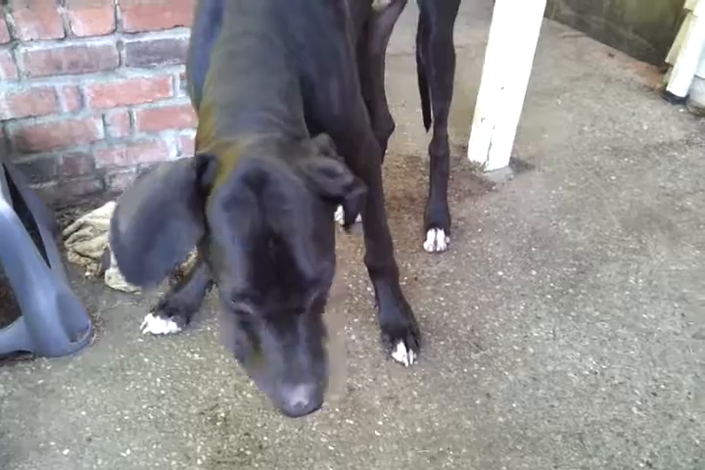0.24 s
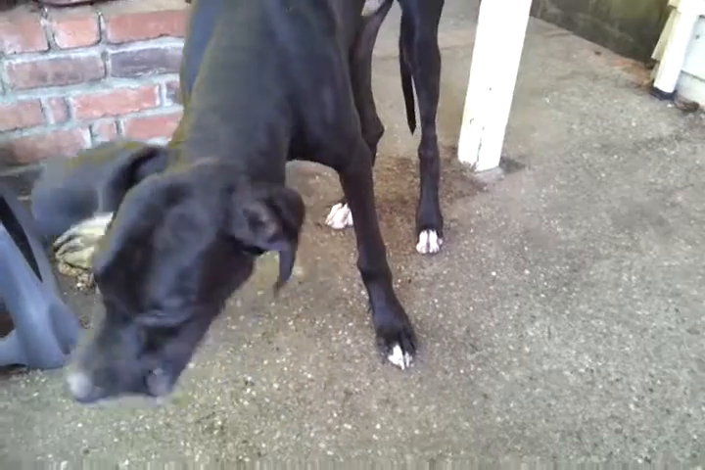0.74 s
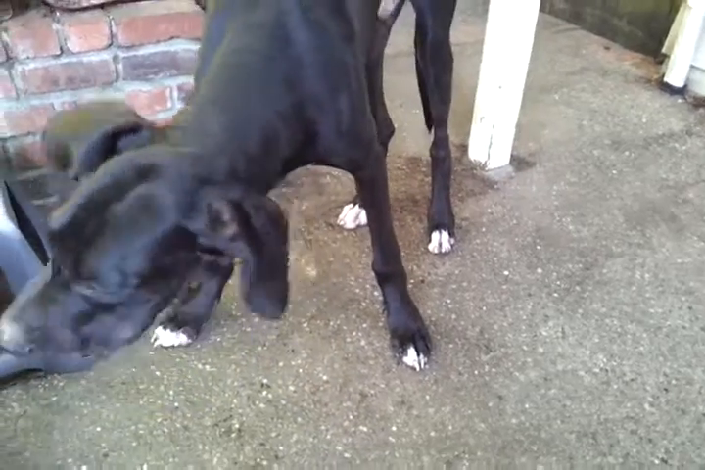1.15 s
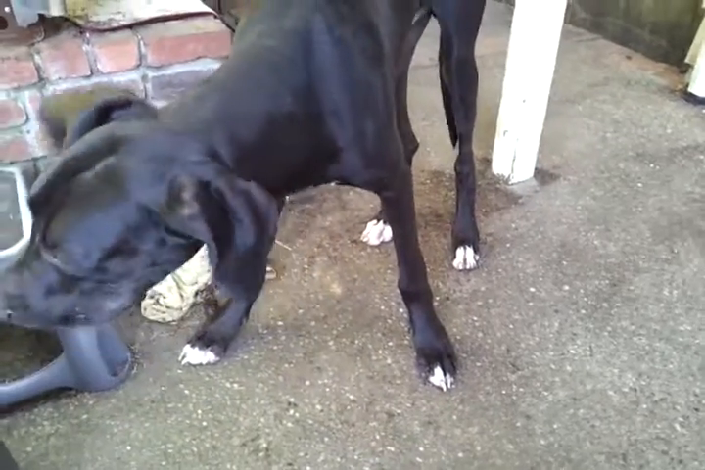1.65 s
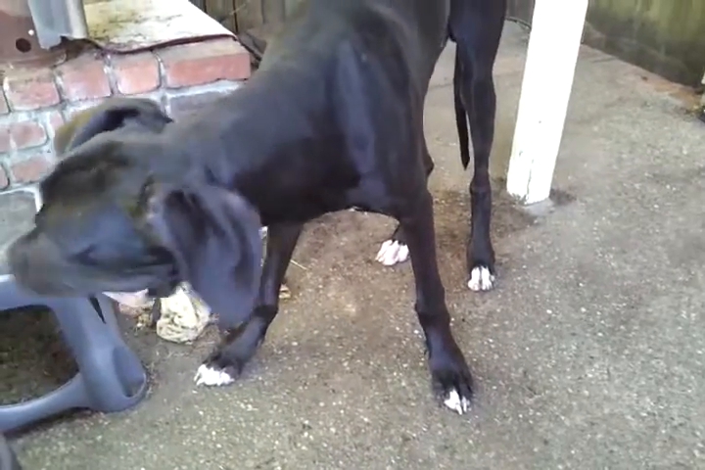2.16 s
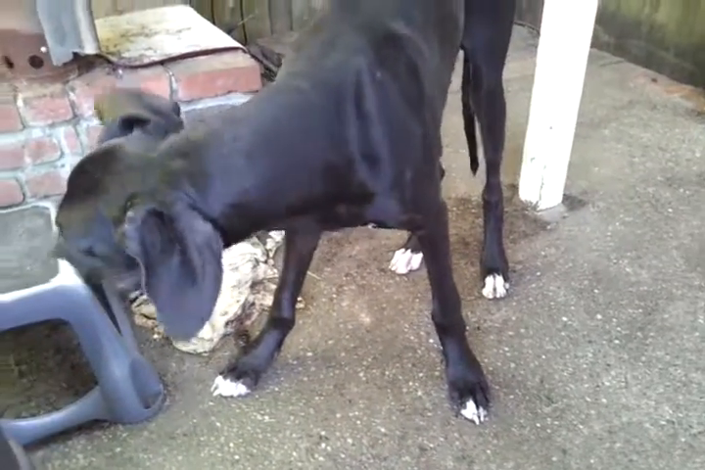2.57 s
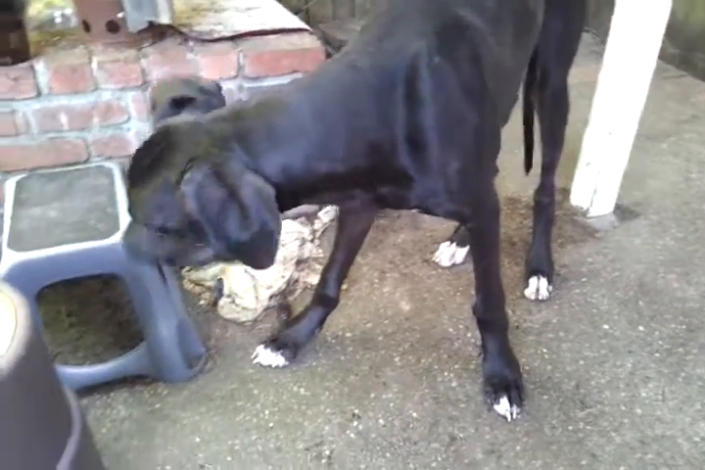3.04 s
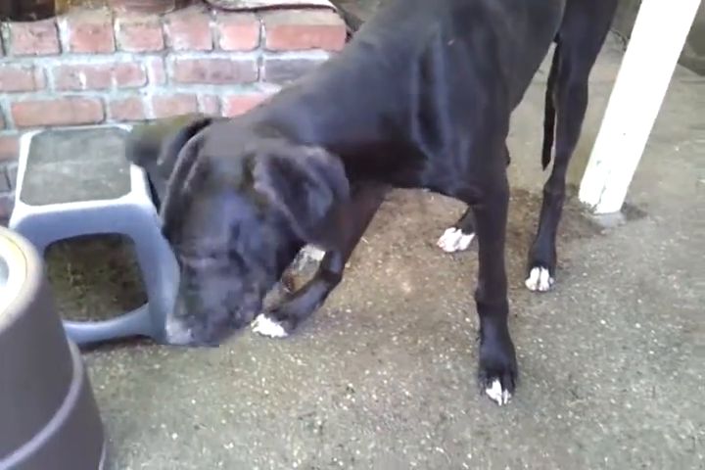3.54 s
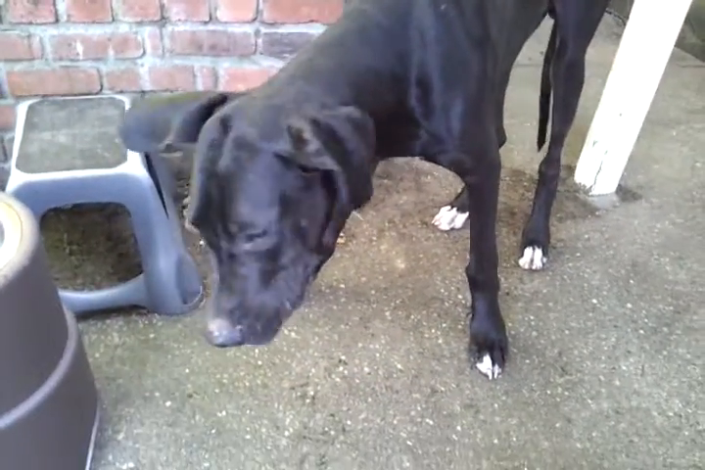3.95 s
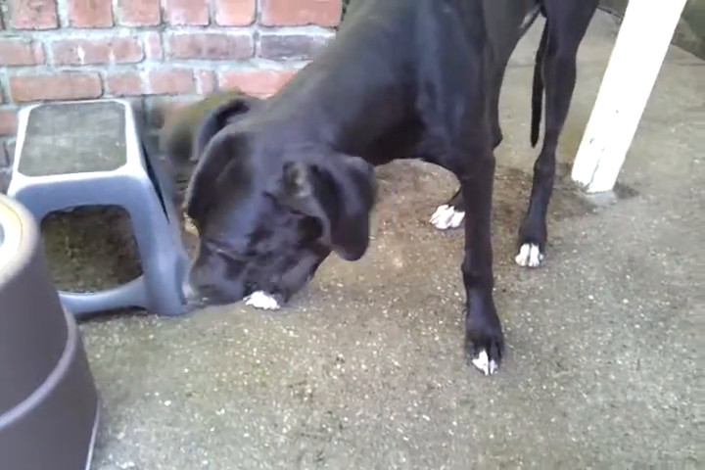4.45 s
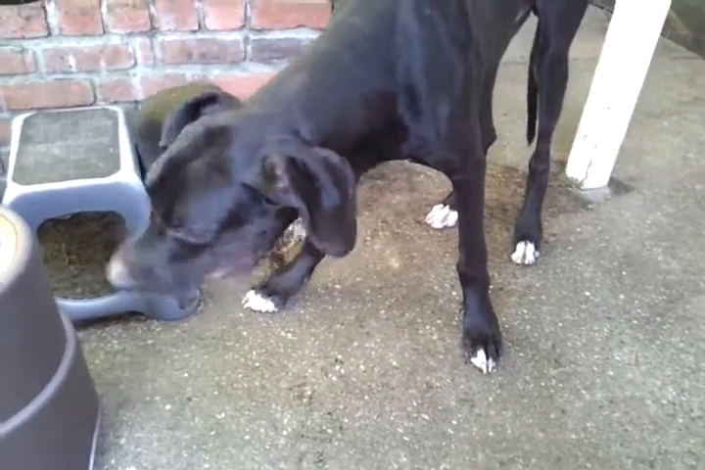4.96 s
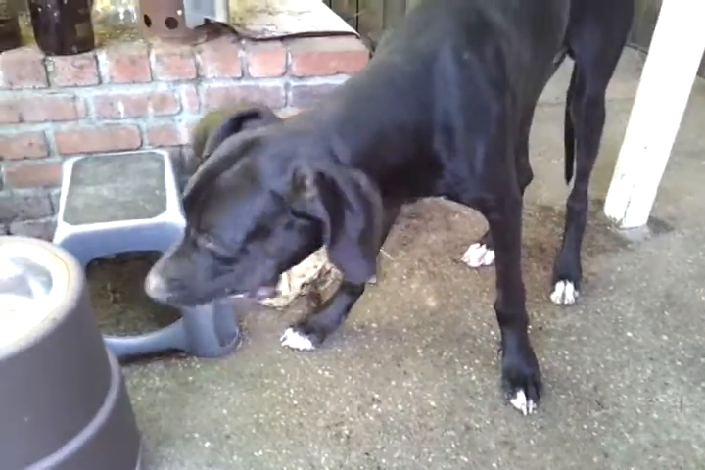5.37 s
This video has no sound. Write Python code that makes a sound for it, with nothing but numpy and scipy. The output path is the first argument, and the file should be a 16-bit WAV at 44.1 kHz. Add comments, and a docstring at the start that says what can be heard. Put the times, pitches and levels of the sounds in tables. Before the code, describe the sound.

Over a soft outdoor hiss and the low, steady hum of a motor, a big dog works through a meaty bone close to the microphone. Its bites make quiet, uneven splintering cracks and hollow clicks, mixed with moist squelches. The chewing eases slightly in the second half, then one thick bone snaps and more crunching follows. The patio adds very little echo.

```python
"""Dog chewing a bone

A large dog chews raw meat and bone on a brick-walled patio, a step from a small microphone.
Each bite splinters the bone for a few milliseconds, which makes the mouth and the piece of bone ring.
Between bites the meat crunches and squelches, and once a thick bone snaps right through.
A motor hums nearby over a soft outdoor hiss."""
import sys
import numpy as np
from scipy import signal
from scipy.fft import rfft, irfft, next_fast_len
from scipy.io import wavfile
from scipy.ndimage import uniform_filter1d

SR = 44100
rng = np.random.default_rng(int(sys.argv[2]) if len(sys.argv) > 2 else 0)


def file_out(sig):
    """Save sig as 16-bit WAV at sys.argv[1]."""
    # one column per channel
    cols = np.atleast_2d(sig).T
    # limit, then scale
    lim = np.clip(cols, -1, 1)
    pcm = np.round(lim * 32767).astype(np.int16)
    wavfile.write(sys.argv[1], SR, pcm)


N = 246954


def amp(db):
    """Turns decibels into a number to multiply by."""
    return 10 ** (np.asarray(db) / 20)


def unit_level(x):
    """Scales x so that its average level (rms) is 1."""
    return x / np.sqrt(np.mean(x ** 2) + 1e-20)


def unit_burst(x):
    """Scales x so that its loudest few milliseconds have level 1."""
    return x / np.sqrt(uniform_filter1d(x ** 2, size=120).max() + 1e-20)


def look_up(curve, hz):
    """Reads a value between the (frequency, value) points of a curve."""
    f, value = np.transpose(curve)
    return np.interp(np.log(hz + 1), np.log(f + 1), value)


def shape_tone(x, curve):
    """Turns each frequency of x up or down by the curve's decibels."""
    size = next_fast_len(len(x) + 512)
    gain = amp(look_up(curve, np.fft.rfftfreq(size, 1 / SR)))
    return irfft(rfft(x, size) * gain, size)[:len(x)]


def resonate(x, hz, width_hz):
    """Makes x ring at a steady or moving pitch; a narrower width rings longer."""
    turn = np.exp(2j * np.pi * np.cumsum(hz * np.ones(len(x))) / SR)
    decay = np.exp(-np.pi * width_hz / SR)
    smoothed = signal.lfilter([1 - decay], [1, -decay], x / turn)  # dividing moves hz down to zero
    return 2 * (turn * smoothed).real


def fractures(shape, spread_db):
    """Tiny breaks that push or pull at random; most are small, a few are large."""
    return rng.standard_normal(shape) * amp(spread_db * np.minimum(rng.exponential(1, shape), 6))


# Tone of the outdoor hiss: f/Hz, relative level/dB
AIR_TONE = [(18, -58), (30, -31), (70, -14), (113, -17), (178, -9), (209, -9.5), (234, -7.5), (287, -5.5),
            (508, -7), (715, -0.5), (2340, -19.5), (5570, -25.5), (7000, -26.5), (9100, -54.5),
            (15400, -120)]
def outdoor_air(level_db=-56.5):
    """Steady, distant hiss and rumble."""
    return amp(level_db) * unit_level(shape_tone(rng.standard_normal(N), AIR_TONE))


# The motor's tones: f/Hz, level/dB
MOTOR_TONES = [(59.2, -82.5), (118.4, -73), (236.9, -62), (355.3, -75)]
def motor_hum(waver_db=0.99):
    """A turning motor hums at multiples of one low note, each wavering a little in level."""
    t = np.arange(N) / SR
    wavers = uniform_filter1d(rng.standard_normal((len(MOTOR_TONES), N)), 3000, axis=1)
    out = np.zeros(N)
    for (hz, db), waver in zip(MOTOR_TONES, wavers):
        height = np.sqrt(2) * amp(db + waver_db * unit_level(waver))
        out += height * np.sin(2 * np.pi * (hz * t + rng.random()))
    return out


# How long the patio's echoes take to fade by 60 dB: f/Hz, fade/s
ECHO_FADES = [(200, 0.04), (700, 0.066), (2000, 0.082), (6000, 0.058)]
def patio_echoes(x, echo_db=-12.0, sway_hz=6.5):
    """Adds echoes from paving and walls; three sets take turns, as when the head moves."""
    out = x.copy()
    sway = 2 * np.pi * sway_hz * np.arange(N) / SR
    delays = np.arange(480, SR // 3, 20)  # the nearest wall answers after 11 ms
    for k in range(3):
        echoes = np.zeros(SR // 2)
        echoes[delays + rng.integers(0, 20, len(delays))] = rng.choice([-1., 1.], len(delays))
        hz, t, bands = signal.stft(echoes, SR, nperseg=256)
        fade = amp(-60 * t / look_up(ECHO_FADES, hz)[:, None])
        tail = signal.istft(bands * fade, SR, nperseg=256)[1]
        share = np.sqrt(2 / 3) * np.cos(sway / 2 + k * np.pi / 3)  # the three keep a steady total power
        out += signal.oaconvolve(x * share, amp(echo_db) * tail / np.linalg.norm(tail))[:N]
    return out


# Squeezes of the jaw: start t/s, length/s, crunch level/dB, change while held/dB,
# mouth level/dB, mouth f/Hz
SQUEEZES = [(-0.02, 0.27, -49.5, -31, -58, 857), (0.344, 0.18, -52, -11.5, -53.5, 810),
            (0.616, 0.035, -64, 2, -61, 710), (0.714, 0.13, -54.5, -3, -77, 783),
            (0.86, 0.072, -56, 3, -55, 953), (1.079, 0.074, -51.5, -11, -56, 963),
            (1.178, 0.16, -44.5, -27.5, -58, 986), (1.467, 0.081, -44, -15.5, -45, 888),
            (1.567, 0.12, -46, -13.5, -50.5, 904), (1.835, 0.12, -48.5, -6, -55, 920),
            (1.964, 0.097, -66, 1.5, -58, 830), (2.127, 0.049, -57, -13, -75, 1010),
            (2.206, 0.16, -53, -8.5, -58.5, 1025), (2.511, 0.16, -52.5, -15, -52, 963),
            (2.825, 0.086, -52.5, -11, -52, 784), (2.941, 0.04, -59.5, 2.5, -60.5, 800),
            (3.115, 0.21, -54.5, -13.5, -52.5, 913), (3.389, 0.052, -74, 2, -61, 804),
            (3.47, 0.22, -66.5, 2.5, -57.5, 847), (3.866, 0.21, -55, -16.5, -52, 818),
            (4.107, 0.061, -72, 4, -65.5, 848), (4.216, 0.33, -60.5, -11.5, -57.5, 906),
            (4.573, 0.52, -65.5, -9, -56.5, 772), (4.832, 0.084, -62, -7, -54, 834),
            (4.999, 0.15, -61, 0.5, -57.5, 756), (5.164, 0.088, -49.5, -15.5, -43, 1027),
            (5.298, 0.063, -69, -3, -55, 713), (5.395, 0.16, -63, -8.5, -56, 830)]
def jaw(close_s=0.0067, release_s=0.012, rest_db=-68):
    """The jaw shuts fast, holds and lets go, setting crunch level, mouth level and mouth pitch."""
    t = np.arange(N) / SR
    crunch_level = mouth_level = amp(rest_db)  # the meat still sounds softly between squeezes
    for start, length, crunch_db, change_db, mouth_db, _ in SQUEEZES:
        age = t - start
        force = np.clip(age / close_s, 0, 1) * amp(change_db * np.clip(age / length, 0, 1))
        force *= np.exp(-np.maximum(age - length, 0) / release_s)
        crunch_level = crunch_level + amp(crunch_db) * force
        mouth_level = mouth_level + amp(mouth_db) * force
    start, length, *_, mouth_hz = np.transpose(SQUEEZES)
    return crunch_level, mouth_level, np.interp(t, start + length / 2, mouth_hz)


# Tone of splintering bone, here and in the bites: f/Hz, level change/dB
SPLINTER_TONE = [(150, -33), (500, -15), (1200, 2), (3000, -4), (5000, -0.5), (6500, -1.5), (8000, 0.5)]
# How coarse, medium and fine bone chips ring: f/Hz, width/Hz
CHIP_RINGS = [(1700, 2100), (3700, 2000), (6200, 3900)]
def chewing(pops_per_s=140, squelch_db=-1.5):
    """The jaw's squeeze sets off clumps of tiny breaks and wet pops, and the mouth rings along."""
    crunch_level, mouth_level, mouth_hz = jaw()
    drift = uniform_filter1d(uniform_filter1d(rng.standard_normal((4, N)), size=300), size=300)
    clumps = amp(2.0 * unit_level(drift[0]) + 2.0 * unit_level(drift[1:]))  # shared + per chip size
    breaks = unit_level(fractures((3, N), spread_db=1.2) * clumps)
    squelch = np.zeros(N)
    for k, hz in enumerate(np.geomspace(1300, 6500, num=15)):  # each pitch has its own pops
        pops = amp(3.0 * rng.standard_normal(N)) * (rng.random(N) < pops_per_s / SR)
        squelch += resonate(pops * clumps[k // 5], hz, 0.087 * hz) / np.sqrt(hz)
    mouth = resonate(resonate(breaks[0], mouth_hz, 420), mouth_hz, 1100)
    chips = sum(resonate(run, hz, width) for run, (hz, width) in zip(breaks, CHIP_RINGS))
    crunch = unit_level(shape_tone(chips, SPLINTER_TONE)) + amp(squelch_db) * unit_level(squelch)
    return crunch_level * crunch + mouth_level * unit_level(mouth)


# The thick bone's own notes: f/Hz, relative level/dB, time to fade by 60 dB/s
BONE_NOTES = [(200, -14, 0.11), (290, -7.5, 0.08), (461, -8, 0.083), (749, -5, 0.0072), (1080, 6.5, 0.027),
              (1600, 5, 0.015), (1995, -1.5, 0.023)]
def bone_snap(start_s=4.846, level_db=-23.5):
    """The thick bone gives way and rings; its low notes last longest, leaving a dull thump."""
    out, t = np.zeros(N), np.arange(4000) / SR
    ring = sum((-1) ** k * amp(db - 60 * t / fade_s) * np.sin(2 * np.pi * hz * t)
               for k, (hz, db, fade_s) in enumerate(BONE_NOTES))  # neighbours swing opposite ways
    out[round(start_s * SR):][:len(t)] = amp(level_db) * unit_burst(ring)
    return out


# Bites that crack clearly: peak t/s, mouth f/Hz, mouth level/dB, bone f/Hz, bone level/dB,
# splinter level/dB, rise/ms, fall/ms
BITES = [(0.064, 995, -50, 2310, -65, -68, 1.5, 6.8), (0.144, 1010, -47, 1450, -47, -45, 0.68, 2.6),
         (0.168, 750, -38, 1470, -38, -33.5, 1.5, 5.4), (0.304, 700, -70, 4940, -56.5, -59, 1.2, 8),
         (0.36, 726, -32, 2400, -30, -33.5, 1.6, 2.6), (0.418, 770, -53, 2130, -53, -38, 1.6, 3.2),
         (0.51, 990, -60, 4500, -52, -37.5, 5.3, 2.6), (0.679, 718, -29, 1440, -75, -60, 9, 1.9),
         (0.732, 760, -39, 1390, -42, -46.5, 8.6, 4.4), (0.747, 747, -35, 1320, -33.5, -62, 2.3, 0.35),
         (0.771, 740, -39.5, 1410, -45, -66, 2.9, 7.4), (0.799, 1280, -60, 1870, -52, -42.5, 2, 1.3),
         (0.838, 1310, -47, 1620, -47, -44, 0.46, 1.2), (0.895, 1060, -41, 1840, -37, -44, 1.3, 1.6),
         (0.904, 1080, -44, 2200, -50, -44, 0.92, 5.1), (0.929, 700, -38, 1030, -39, -48, 2.1, 3.5),
         (1.025, 850, -58, 4600, -69, -47, 1.7, 3.1), (1.096, 1110, -41, 1910, -42, -41.5, 6.5, 6.6),
         (1.104, 716, -41, 3020, -61, -40, 3, 2.4), (1.117, 770, -55, 1640, -45, -41.5, 2.8, 1),
         (1.189, 1050, -30.5, 1650, -39.5, -50, 1.27, 1.6), (1.217, 1140, -55, 2550, -53, -53, 0.76, 1.5),
         (1.269, 815, -46, 1860, -46, -63, 1.3, 3.6), (1.308, 1070, -47, 1410, -44.5, -49, 1.4, 2.2),
         (1.488, 700, -39.5, 1530, -35.5, -39, 1.7, 3.4), (1.575, 995, -41.5, 1490, -38.5, -34.5, 1.3, 1.5),
         (1.602, 1000, -42, 3280, -42.5, -27.5, 0.28, 3.4), (1.613, 950, -48.5, 3720, -44.5, -39, 4.5, 7.2),
         (1.637, 604, -38, 1980, -45.5, -54, 3.6, 6.4), (1.668, 466, -40.5, 1800, -35, -45, 3.6, 1.8),
         (1.848, 1030, -55, 1790, -57, -45, .9, 1.8), (1.861, 966, -32.5, 1450, -35, -31, 2, 0.48),
         (1.925, 954, -43, 1430, -42, -54, 1.6, 1.4), (1.95, 920, -51, 1970, -50.5, -42.5, 7.4, 1),
         (1.998, 986, -42, 4780, -41, -37.5, 0.93, 5.5), (2.061, 615, -42.5, 1560, -48.5, -50, 2.4, 3.7),
         (2.09, 940, -48.5, 1620, -67, -60, 2.1, 2.5), (2.151, 1025, -45, 2870, -49.5, -59, 4.9, 3.5),
         (2.167, 1010, -47, 2040, -48, -62, 5.1, 3.2), (2.224, 1054, -38, 1420, -41.5, -36, 4, 4),
         (2.247, 1000, -45, 1900, -41.5, -59, 1.4, 9.2), (2.335, 1090, -52, 1460, -54, -46, 2.4, 6.1),
         (2.363, 980, -56, 1970, -51, -44.5, 2.7, 2.3), (2.522, 680, -44.5, 2050, -53, -43.5, .96, 7.8),
         (2.571, 710, -58, 3100, -46, -41, 1.4, 5.2), (2.839, 784, -42, 1820, -47, -43.5, 6.1, 2.4),
         (2.847, 920, -48, 5540, -47, -55, .8, 1.4), (2.874, 1310, -65, 1490, -40.5, -41.5, 1.8, 4),
         (2.974, 703, -45, 3000, -41.5, -44, 1.9, 0.95), (3.145, 710, -54, 2400, -48, -43.5, 2.5, 2.8),
         (3.171, 676, -45, 1890, -46.5, -43, 1.5, 0.94), (3.195, 1080, -56, 3060, -63, -40, 0.86, 2.8),
         (3.279, 880, -58, 3670, -44, -62, .71, 1.5), (3.415, 770, -39.5, 1370, -46, -56, 2.1, 1.6),
         (3.491, 730, -45, 1420, -50, -43.5, 12.6, 6.3), (3.564, 1060, -53, 4100, -66, -46, 0.91, 9.7),
         (3.627, 790, -42, 1640, -47.5, -43, 3.5, 3.8), (3.674, 1060, -47.5, 1750, -51.5, -61, 3.9, 4.5),
         (3.883, 700, -44, 3350, -47, -51, 9.8, 5.4), (3.929, 790, -44, 2560, -51, -49, 2.1, 8.4),
         (3.991, 1110, -60, 3780, -51.5, -45.5, .63, 3.3), (4.032, 850, -56, 2960, -54.5, -48, 2, 2.4),
         (4.051, 716, -54, 1660, -49.5, -57, 3.1, 3.2), (4.119, 810, -55, 1580, -70, -48, 1.1, 3.3),
         (4.237, 1130, -39.5, 2460, -52.5, -42, 3.6, 7.7), (4.271, 694, -49, 1660, -47, -50, .9, 2.3),
         (4.281, 820, -59, 5630, -48.5, -50, 5, 8.6), (4.346, 836, -49, 1830, -56, -49.5, 4.9, 1.5),
         (4.381, 1100, -52, 4400, -42, -37.5, 0.45, 0.58), (4.418, 640, -49, 1880, -53, -42.5, 0.68, 14),
         (4.429, 675, -39.5, 2670, -46, -54, 1, 3), (4.469, 805, -55, 3720, -85, -49, .81, 2.1),
         (4.605, 700, -43.5, 1370, -51.5, -43.5, .76, 11), (4.637, 770, -46, 1540, -55, -53, 2.1, 2.9),
         (4.687, 854, -57, 5800, -48, -55, 3, 2.7), (4.717, 700, -62, 3430, -43.5, -63, 1.3, 2.3),
         (4.729, 723, -41.5, 3700, -58, -47, 2, 4.7), (4.769, 1120, -49, 2630, -53, -43, 1.1, 0.42),
         (4.8464, 666, -27, 2600, -41.5, -25.5, 0.19, 5), (5.015, 704, -41.5, 2680, -52.5, -43, 5.2, 6.8),
         (5.128, 1120, -48, 1700, -56, -76, 2.5, 1.8), (5.168, 1135, -40.5, 5170, -46.5, -52, 2.1, 5.4),
         (5.177, 1110, -49, 1660, -43, -42, 3.9, 3.6), (5.205, 670, -38.5, 3100, -63, -39, 3.2, 8.3),
         (5.271, 726, -38, 1340, -44, -46, 3.3, 1.2), (5.323, 770, -55, 4200, -56, -53, 2.2, 2.7),
         (5.381, 730, -47.5, 1670, -52.5, -58, 3.4, 2.8), (5.411, 1124, -45, 2720, -58, -51, 4.1, 8.9),
         (5.484, 770, -47, 3260, -49, -59, 1.4, 5), (5.502, 750, -44.5, 3330, -69, -46.5, 2.8, 4.1)]
def bite_cracks():
    """Each bite is a run of breaks that swells and dies, heard through mouth, bone and open air."""
    lead, length = 800, 3000  # samples before a crack's peak, and in the whole crack
    out = np.zeros(N + length + lead)
    ms = (np.arange(length) - lead) / SR * 1000
    breaks = fractures((len(BITES), length), spread_db=3.5)
    chip_pitches = 2000 * 3.53 ** rng.random((len(BITES), 3))  # three loose chips ring with each crack
    for bite, run, chips_hz in zip(BITES, breaks, chip_pitches):
        peak_s, mouth_hz, mouth_db, bone_hz, bone_db, splinter_db, rise_ms, fall_ms = bite
        slope_ms = np.where(ms < 0, rise_ms, fall_ms)
        burst = run * np.exp(-(abs(ms) / slope_ms) ** 1.2)  # a swell with a rounded top
        mouth = resonate(resonate(burst, mouth_hz, 110), mouth_hz, 270)  # twice, for a hollow ring
        bone = resonate(resonate(burst, bone_hz, 0.13 * bone_hz), bone_hz, 2900)  # higher dies sooner
        chips = sum(resonate(burst, hz, 430) for hz in chips_hz)
        splinters = shape_tone(burst + 2.12 * chips, SPLINTER_TONE)
        crack = amp(mouth_db) * unit_burst(mouth) + amp(bone_db) * unit_burst(bone)
        crack += amp(splinter_db) * unit_burst(splinters)
        out[round(peak_s * SR):][:length] += crack
    return out[lead:][:N]


def scene():
    """The dog and its echoes, over the motor and the outdoor hiss, in one channel."""
    dog = bite_cracks() + bone_snap() + chewing()
    return (patio_echoes(dog) + motor_hum() + outdoor_air())[None]


# Tone of the small microphone: f/Hz, level change/dB
MICROPHONE_TONE = [(25, -20), (60, -8.5), (150, -2), (400, -3), (6300, 1.5), (7200, -4), (7700, -16),
                   (8100, -23), (8600, -28)]
def record(dry):
    """A small microphone loses bass and top, its amplifier hisses, and the highest treble is cut."""
    heard = shape_tone(dry[0], MICROPHONE_TONE)[None]
    hiss = amp(-87.5) * rng.standard_normal((1, N))
    treble_cut = signal.firwin(511, cutoff=8890, window=("kaiser", 9), fs=SR)
    return signal.oaconvolve(heard + hiss, treble_cut[None], "same")


dry = scene()
out = record(dry)
file_out(out)
```